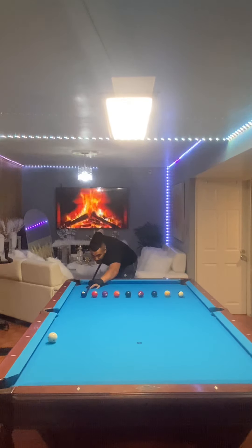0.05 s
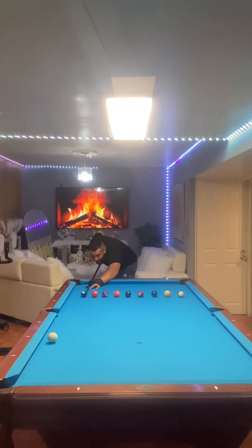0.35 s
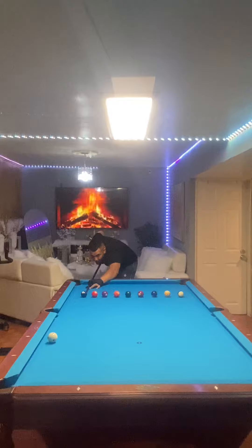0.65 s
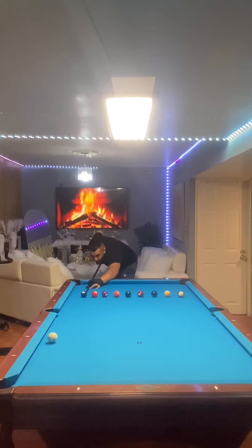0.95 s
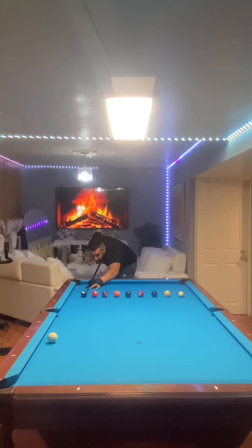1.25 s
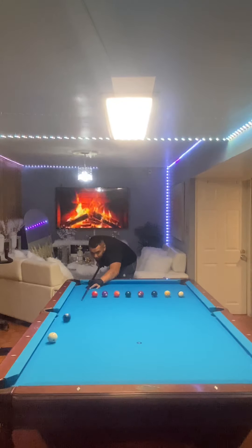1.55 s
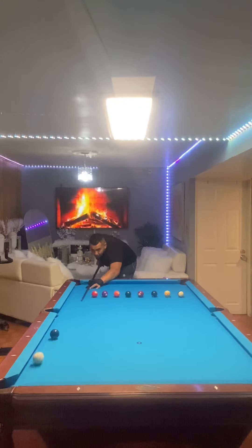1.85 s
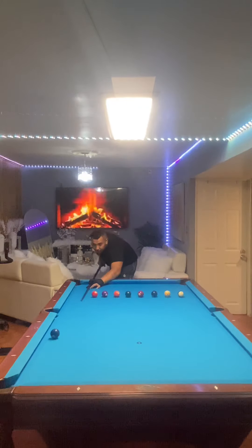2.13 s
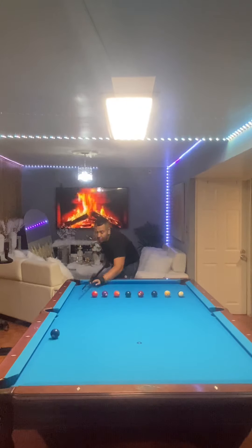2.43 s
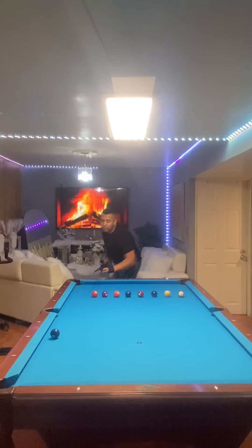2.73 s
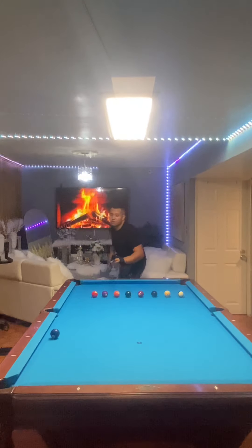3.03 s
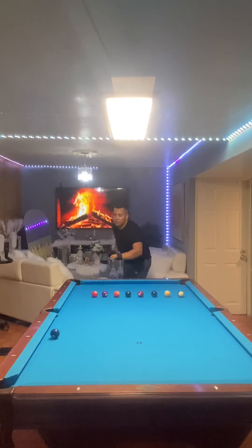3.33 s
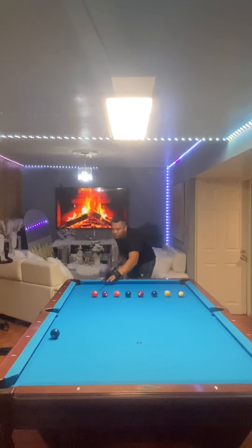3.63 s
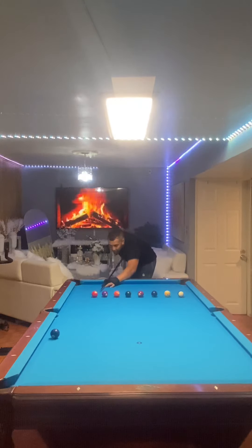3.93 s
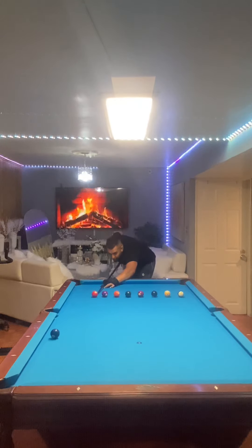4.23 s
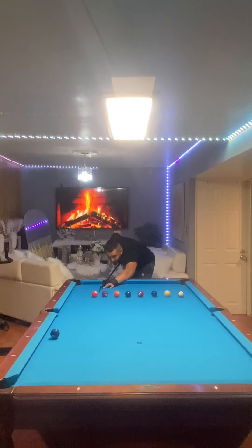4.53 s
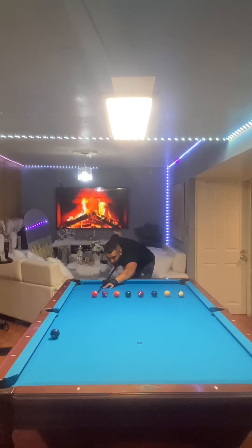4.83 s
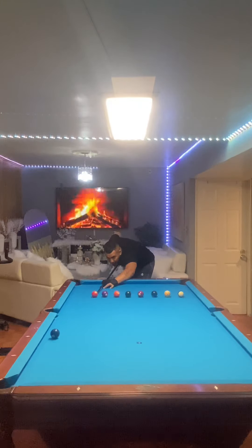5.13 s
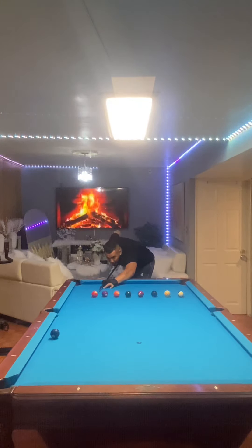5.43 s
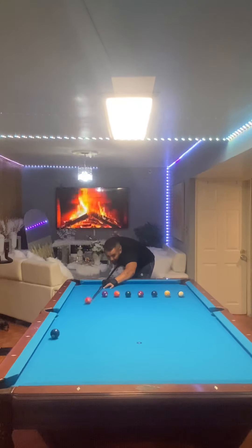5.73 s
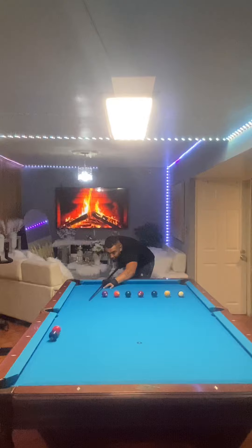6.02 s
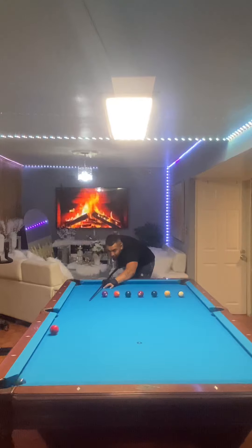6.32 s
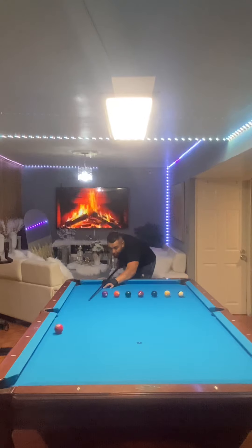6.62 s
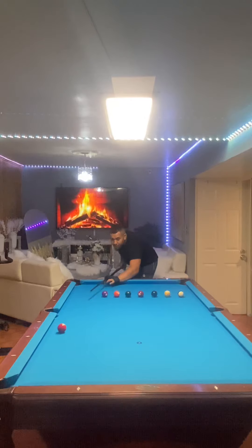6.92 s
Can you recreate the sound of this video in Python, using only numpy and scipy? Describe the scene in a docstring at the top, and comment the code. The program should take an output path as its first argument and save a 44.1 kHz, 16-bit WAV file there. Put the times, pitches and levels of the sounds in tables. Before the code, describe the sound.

Two pool shots in a quietly humming room, each with a cue knock, a sharp ball clack and a thud into the pocket.

```python
"""Over a faint ventilation hum, a cue knocks a pool ball; it rolls, clacks off a second ball, and a ball
thuds into the corner pocket and drops onto those lying there. Two such shots sound in a basement room.
Each impact is a short pulse, brighter the briefer the contact; cue shaft and table frame ring in their
modes, rolling rumbles through the slate, and the room reverberates. The player shifts and handles the
cue with soft swishes and taps. All is heard from the near end of the table."""
import sys
import numpy as np
from scipy import signal
from scipy.fft import rfft, irfft, next_fast_len
from scipy.io import wavfile
from scipy.ndimage import uniform_filter1d, minimum_filter1d

SR = 44100
rng = np.random.default_rng(int(sys.argv[2]) if len(sys.argv) > 2 else 0)


def wrap_up_sound(samples):
    """Save the sound to the file named by the first command line argument, as 16-bit audio."""
    columns = np.atleast_2d(samples).T
    # keep every value between -1 and 1, then stretch to whole-number steps
    tamed = np.clip(columns, -1, 1)
    steps = np.round(tamed * 32767).astype(np.int16)
    wavfile.write(sys.argv[1], SR, steps)


N = 311787

# cue striking the ball: start_s, level_db
CUE_STROKES = [(1.3266, 13.5), (5.6846, 14.5)]
# ball striking the pocket's rail: start_s, level_db
RAIL_HITS = [(2.0514, -4), (6.3407, -1.5)]


def ball_clacks(focus_hz=2000, focus_width_hz=1400):
    """Elastic impact: hard balls touch so briefly that they radiate a sharp pulse, which the room echoes."""
    # ball meeting ball in the open: start_s, level_db
    collisions = [(1.7161, 23.5), (6.0216, 24.5)]
    # spectrum of the contact: frequency_hz, level_db
    ball_spectrum = [(100, -39), (450, -30.5), (800, -11.5), (1300, -8.5), (1900, -2.5), (2500, -5.5),
                     (3300, -12), (4300, -21), (5000, -31), (5800, -46), (8000, -52), (10500, -50),
                     (12000, -62.5), (16000, -63.5)]
    # spectrum of the slate's reaction: frequency_hz, level_db
    reaction_spectrum = [(100, -8.5), (400, -7), (800, 7), (1300, -19), (2500, -23), (5000, -21.5),
                         (9000, -37.5), (14000, -59.5)]
    # reflections off rail, ceiling and walls: delay_s, left_gain, right_gain
    echoes = [(.0008, .1, .06), (.0019, .3, 0.14), (.0033, .06, 0.099), (.0064, .09, 0.043),
              (.0097, 0.1, 0.12), (.0121, 0.06, 0.099), (.0242, 0.033, .11), (.0328, 0.085, .12),
              (.0374, .11, .05), (.04, .06, .12)]
    slate_delay_s = .0012  # the balls press on the slate just after they meet
    pulse = impact_pulse(ball_spectrum)
    midband = signal.lfilter(*signal.iirpeak(focus_hz, focus_hz / focus_width_hz, SR), pulse)
    knock = amp(-17.5) * np.roll(impact_pulse(reaction_spectrum), round(slate_delay_s * SR))
    crack = amp(5) * midband + knock
    near = direct_path(lag_s=.0001, side_db=-0.9, echoes=echoes)
    room = amp(-4.2) * reverberation(build_s=.009, decay_scale=1.1)
    return at_times(collisions, propagate(crack, near) + propagate(pulse, room))


def cue_strokes():
    """Cushioned impact: the leather tip gives a dull, direct knock; the shaft radiates into the room."""
    # spectrum of the tip's contact: frequency_hz, level_db
    tip_spectrum = [(100, -10), (250, -48), (400, -1), (600, 12), (900, 3.5), (1300, -4.5), (2000, -9.5),
                    (3500, -41), (6000, -52), (10000, -62), (15000, -78)]
    knock = amp(-4.5) * propagate(impact_pulse(tip_spectrum), direct_path(lag_s=.00013, side_db=-1.0))
    ring = amp(-1) * propagate(cue_shaft(), reverberation(build_s=.005, decay_scale=0.82))
    return at_times(CUE_STROKES, knock + ring)


def cue_shaft(crack_db=0, size=4096):
    """Free vibration of a bar: the struck wood gives a dry crack and rings in damped bending modes."""
    # spectrum of the crack: frequency_hz, level_db
    crack_spectrum = [(60, -12.5), (130, 0.5), (350, 0), (500, 2), (800, 5), (1250, -6), (1700, -10.5),
                      (3500, -11), (5000, -23.5), (7000, -35), (10000, -40), (12000, -66.5), (16000, -75)]
    # bending modes: pitch_hz, level_db, t60_s
    modes = [(820, -45, 0.17), (1516, -43, 0.12), (1892, -48, 0.039), (1945, -41, 0.054),
             (2620, -34.5, 0.031), (3120, -41, 0.045), (3460, -46, .05), (3770, -46.5, 0.035),
             (4600, -53.5, 0.099), (5200, -54, 0.059), (5580, -63, 0.046)]
    t = np.arange(size) / SR
    ring = sum(amp(db - 60 * t / t60) * np.sin(2 * np.pi * hz * t) for hz, db, t60 in modes)
    cushioned = signal.sosfilt(signal.butter(2, 6000, fs=SR, output="sos"), ring)  # leather softens it
    return amp(crack_db) * impact_pulse(crack_spectrum) + amp(-7.5) * cushioned


def rail_thuds():
    """Modal response: a ball hits the pocket's rubber; the rail rings at once, the heavy frame later."""
    # modes of rail and frame, swelling as the blow spreads: pitch_hz, level_db, swell_s, t60_s
    modes = [(76.1, -37.5, 0.13, 0.72), (133, -29, 0.036, 0.24), (235.3, -16.5, 0.018, 0.017),
             (254.1, -13, 0.041, 0.12), (318.3, -17.5, 0.037, 0.14), (398.6, -28.5, 0.069, 0.14),
             (430.3, -12, 0.00092, 0.12), (459, -25.5, 0.0059, 0.44), (657, -40, 0.00097, 0.1),
             (711, -14.5, 0.00067, 0.044), (845, -20, 0.0045, 0.13), (1000, -24, 0.011, 0.11),
             (1070, -42, .0045, 0.21)]
    # spectrum of the blow on the rubber: frequency_hz, level_db
    rail_spectrum = [(50, -49.5), (120, -8.5), (260, 0), (450, -1), (600, -6.5), (900, -8), (1300, -22.5),
                     (2000, -32.5), (3500, -47), (6000, -63), (10000, -75.5), (16000, -66.5)]
    t = np.arange(SR // 2) / SR
    ring = 0
    for hz, db, swell_s, t60 in modes:
        rise = np.sin(np.pi / 2 * np.minimum(t / swell_s, 1)) ** 2
        fall = amp(db - 60 * np.maximum(t - swell_s, 0) / t60)
        ring -= rise * fall * np.sin(2 * np.pi * hz * t)
    near = direct_path(lag_s=0.00026, side_db=-0.5)
    woodwork = amp(21) * reverberation(build_s=.003, decay_scale=.2)
    room = amp(26) * reverberation(build_s=0.0082, decay_scale=0.87)
    thud = propagate(impact_pulse(rail_spectrum), amp(13.5) * near + woodwork + room)
    return at_times(RAIL_HITS, propagate(ring, near)) + at_times(RAIL_HITS, thud)


def pocket_drops():
    """Acoustic shielding: the table screens clacks inside the pocket, so cavity and room dominate."""
    # knocks among pocketed balls, higher for a shorter contact: start_s, level_db, treble_db, pitch_ratio
    knocks = [(2.2537, 1, 4, 1.17), (2.256, -1.5, 2, 1.26), (2.2949, -4, -14, 1.1), (2.3001, -1, -10, 1.02),
              (2.356, -14, 9, 0.93), (6.424, -43, 22, 1.88), (6.5158, -2, -10.5, 1.09),
              (6.5751, 3, -11, 0.98), (6.5871, 0.5, -3.5, 0.98), (6.678, 0.5, -2.5, 1.01),
              (6.763, -6.5, 7, 0.84), (6.786, -4.5, 5, 0.59)]
    # spectrum of one such knock: frequency_hz, level_db
    knock_spectrum = [(100, -20.5), (500, -15.5), (1100, -6.5), (1800, 1), (2200, -1), (2850, -1),
                      (3300, -15.5), (3900, -19), (4700, -21), (6000, -27), (8000, -43.5), (10000, -38.5),
                      (12000, -80.5)]
    out = np.zeros((2, N))
    near = amp(-4) * direct_path(lag_s=.0001, side_db=1)
    for start_s, db, treble_db, pitch_ratio in knocks:
        cavity = amp(-4) * reverberation(build_s=0.0005, decay_scale=0.04)
        room = amp(2.14) * reverberation(build_s=0.0022, decay_scale=0.77)
        pulse = impact_pulse(knock_spectrum, treble_db, pitch_ratio)
        mix_in(out, start_s, amp(db) * propagate(pulse, near + cavity + room))
    return out


def rolling_balls(skid_s=0.13, skid_db=-42.5, roll_db=-53.5):
    """Structure-borne sound: slate and frame rumble as a ball skids, grips, rolls, bumps and settles."""
    # spectrum of the slate's response: frequency_hz, level_db
    slate_spectrum = [(30, -19.5), (70, 3.5), (120, 1.5), (170, -5.5), (260, -2.5), (450, -19),
                      (800, -10.5), (1500, -24), (4000, -48.5), (9000, -90.5)]
    # a ball rolling to rest in the pocket: start_s, length_s, level_db
    settling = [(2.19, 0.19, -44), (6.48, 0.32, -45.5)]
    # a ball landing on the slate after a hop, or on the pocket floor: start_s, level_db
    bumps = [(1.515, -3.5), (2.158, -7), (5.781, -17), (5.841, -9), (6.449, -2)]
    runs = list(settling)
    for (struck_s, _), (pocketed_s, _) in zip(CUE_STROKES, RAIL_HITS):
        runs += [(struck_s, skid_s, skid_db), (struck_s, pocketed_s - struck_s, roll_db)]
    motion = motion_envelope(runs, rise_s=0.022, fall_db_per_s=100.5)
    rumble = unit_rms(shaped_noise(lambda hz: amp(curve_at(slate_spectrum, hz)))) * motion
    near = amp(13) * direct_path(lag_s=.0001, side_db=2)
    room = amp(-3.5) * reverberation(build_s=0.004, decay_scale=0.32)
    return rumble + at_times(bumps, propagate(impact_pulse(slate_spectrum), near + room))


def player():
    """Friction and light impact: swishes and taps at the far end arrive as reverberant sound."""
    # sleeve and cue sliding over hand and cloth: start_s, length_s, level_db
    slides = [(2.17, 0.065, -72), (2.3, 1.87, -89.5), (2.916, 0.17, -76.5), (3.392, 0.31, -94.5),
              (3.64, 0.2, -82.5), (4.2, 1.4, -94.5), (6.72, .35, -83.5), (6.882, 0.076, -80)]
    # spectrum of rubbed cloth: frequency_hz, level_db
    cloth_spectrum = [(200, -13.5), (1000, 6.5), (2600, -1), (4200, -4), (5200, -9), (6500, -14),
                      (8000, -17), (10000, -20.5), (12000, -51)]
    # taps on the cue as it is handled: start_s, level_db
    taps = [(1.52, -24.5), (2.521, -20.5), (2.762, -27.5), (3.396, -22.5), (3.642, -16), (3.746, -30)]
    motion = motion_envelope(slides, rise_s=0.031, fall_db_per_s=202)
    swish = unit_rms(shaped_noise(lambda hz: amp(curve_at(cloth_spectrum, hz))))[0] * motion
    out = amp(14.5) * propagate(swish, reverberation(build_s=0.0016, decay_scale=0.55))[:, :N]
    tap = cue_shaft(crack_db=-5.5) + amp(-10.5) * impact_pulse(cloth_spectrum)
    for start_s, db in taps:
        mix_in(out, start_s, amp(db) * propagate(tap, reverberation(build_s=0.00042, decay_scale=0.28)))
    return out


def ventilation():
    """Noise-driven resonance: steady airflow excites narrow bands of fan and duct, a wavering hum."""
    # spectrum of the airflow: frequency_hz, density_db
    air_spectrum = [(20, -101.5), (52, -78), (100, -72.5), (150, -93.5), (330, -90.5), (480, -89.5),
                    (680, -90.5), (950, -99), (1500, -99), (2300, -105), (2900, -115.5), (4400, -116),
                    (7500, -130), (10500, -133), (12000, -147)]
    # resonances of fan and duct: pitch_hz, width_hz, density_db
    resonances = [(63.94, 13, -65), (110.8, 16.8, -64), (211.7, 16, -70.5), (243, 22, -78),
                  (323, 27, -77.5), (350.7, 19, -75), (752.3, 26, -78), (842.5, 78, -88.5),
                  (1062, 7, -81.5), (1124, 8.2, -85), (2450, 25, -106), (6400, 470, -120)]

    def gain(hz):
        peaks = sum(amp(db) ** 2 / (1 + 2 * ((hz - f) / width) ** 2) ** 2 for f, width, db in resonances)
        power_density = amp(curve_at(air_spectrum, hz)) ** 2 + peaks
        return np.sqrt(power_density * SR / 2)
    return shaped_noise(gain) * amp([[.3], [-.3]])  # slightly to the left


def impact_pulse(spectrum, treble_db=0, pitch_ratio=1, size=4096):
    """Minimum-phase pulse of a given spectrum; a harder contact shifts it up and lifts the treble."""
    hz = abs(np.fft.fftfreq(size, 1 / SR))
    shelf_db = treble_db * hz ** 4 / (hz ** 4 + 4200 ** 4)
    log_gain = np.log(amp(curve_at(spectrum, hz / pitch_ratio) + shelf_db))
    return np.fft.ifft(np.exp(np.conj(signal.hilbert(log_gain)))).real


def motion_envelope(movements, rise_s, fall_db_per_s):
    """Summed gain of movements: each swells, holds for its length, then decays exponentially."""
    envelope = np.zeros(N)
    for start_s, length_s, db in movements:
        age = np.arange(N) / SR - start_s
        swell = np.sin(np.pi / 2 * np.clip(age / rise_s, 0, 1)) ** 2
        envelope += swell * amp(db - fall_db_per_s * np.maximum(age - length_s, 0))
    return envelope


def direct_path(lag_s, side_db, echoes=()):
    """Path difference: the direct sound reaches the left microphone later; any echoes follow."""
    path = np.zeros((2, SR))
    path[0, round(lag_s * SR)] = amp(side_db / 2)
    path[1, 0] = amp(-side_db / 2)
    for delay_s, left, right in echoes:
        path[:, round(delay_s * SR)] += left, right
    return path


def reverberation(build_s, decay_scale):
    """Diffuse field: reflections grow denser, then are absorbed at a different rate in each band."""
    # the room's decay, before decay_scale multiplies it: frequency_hz, t60_s
    room_decay = [(100, 0.38), (300, 0.69), (700, 0.39), (1400, 0.71), (2500, 0.64), (4000, 0.58),
                  (7000, 0.55), (12000, 0.21)]
    t = np.arange(SR) / SR
    density = np.minimum(.03 + t * 1.5, 1)  # share of samples holding a reflection
    reflections = rng.choice([-1., 1.], (2, SR)) * (rng.random((2, SR)) < density) / np.sqrt(density)
    hz, frame_s, spectra = signal.stft(reflections, SR, nperseg=256)
    t60 = decay_scale * curve_at(room_decay, hz[:, None])
    spectra = correlated_pair(spectra, hz[:, None]) * amp(-60 * frame_s / t60)
    tail = signal.istft(spectra, SR, nperseg=256)[1][:, :SR] * (1 - np.exp(-t / build_s))
    return tail / np.sqrt(np.sum(tail ** 2) / 2)


def correlated_pair(spectra, hz):
    """Spatial coherence: two close microphones receive long waves alike, short ones less so."""
    # likeness of left and right: frequency_hz, correlation
    coherence = [(60, 1), (150, 0.91), (350, 0.81), (600, 0.26), (1100, 0.13), (2000, 0.51), (4000, 0.22),
                 (10000, 0.21)]
    angle = np.arccos(np.clip(curve_at(coherence, hz), -1, 1)) / 2
    mid, side = np.cos(angle) * spectra[0], np.sin(angle) * spectra[1]
    return np.array([mid + side, mid - side])


def shaped_noise(gain):
    """Partly coherent stereo noise with the spectrum gain(hz)."""
    size = next_fast_len(N)
    hz = np.fft.rfftfreq(size, 1 / SR)
    white = rfft(rng.standard_normal((2, size)))
    return irfft(correlated_pair(white, hz) * gain(hz))[:, :N]


def propagate(sound, path):
    """Convolution carries a sound along a stereo path."""
    return signal.fftconvolve(sound[None], path, axes=1)


def at_times(events, sound):
    """The same sound at every (start_s, level_db)."""
    out = np.zeros((2, N))
    for start_s, db in events:
        mix_in(out, start_s, amp(db) * sound)
    return out


def mix_in(mix, start_s, sound):
    """Superposes a stereo sound on the mix."""
    part = mix[:, round(start_s * SR):][:, :sound.shape[1]]
    part += sound[:, :part.shape[1]]


def curve_at(points, hz):
    """Linear interpolation on a log-frequency axis."""
    frequencies, values = np.transpose(points)
    return np.interp(np.log(hz + 1), np.log(frequencies), values)


def unit_rms(x):
    """Scales to rms 1."""
    return x / np.sqrt(np.mean(x ** 2))


def amp(db):
    """Decibels to gain."""
    return 10 ** (np.asarray(db) / 20)


def scene():
    """Superposition: the pressures of all sources in the room add."""
    shots = cue_strokes() + ball_clacks() + rail_thuds() + pocket_drops() + rolling_balls()
    return shots + player() + ventilation()


def record(dry, bass_hz=36, ceiling=.92, edge_hz=15800):
    """Band and peak limiting: the microphone's bass roll-off, a fast limiter on the clacks, a low-pass."""
    thinned = signal.sosfilt(signal.butter(2, bass_hz, "highpass", fs=SR, output="sos"), dry)
    allowed_gain = ceiling / np.maximum(abs(thinned).max(0), ceiling)
    limited = thinned * uniform_filter1d(minimum_filter1d(allowed_gain, size=121), size=61)
    lowpass = signal.firwin(255, edge_hz, window=("kaiser", 9), fs=SR)
    return signal.oaconvolve(limited, lowpass[None], "same")


dry = scene()
out = record(dry)
wrap_up_sound(out)
```